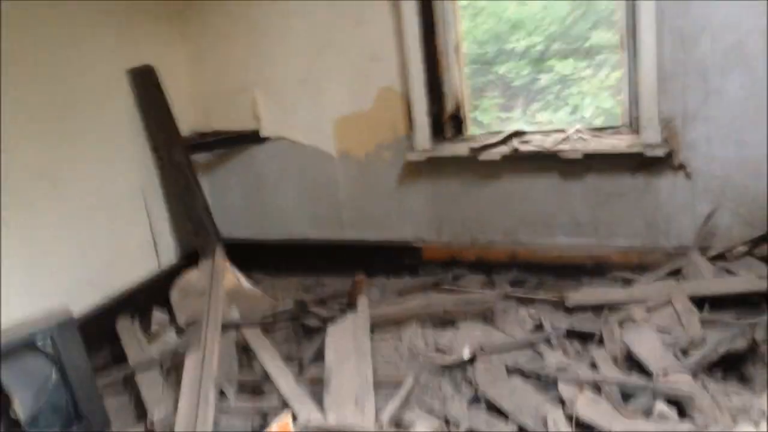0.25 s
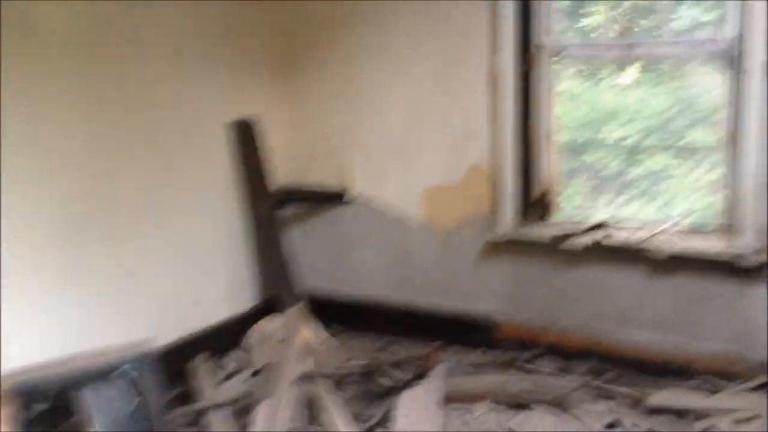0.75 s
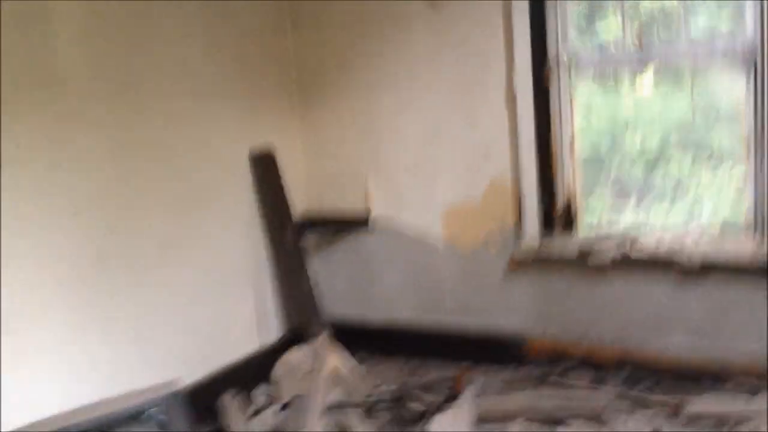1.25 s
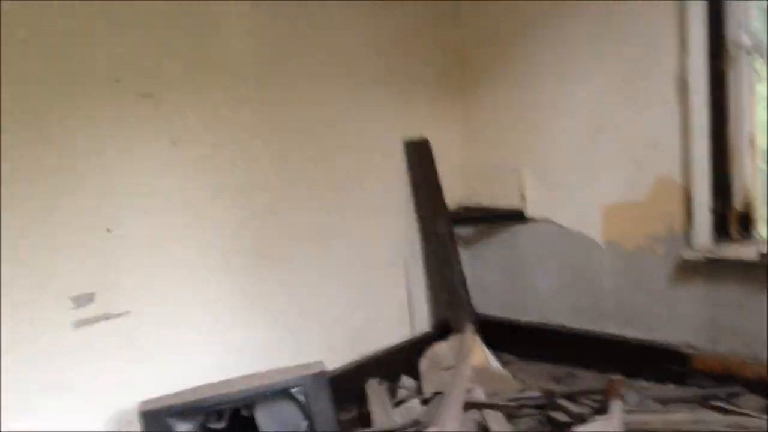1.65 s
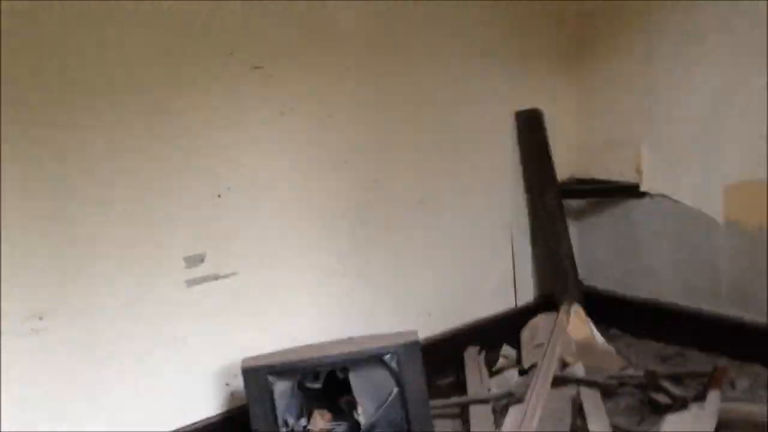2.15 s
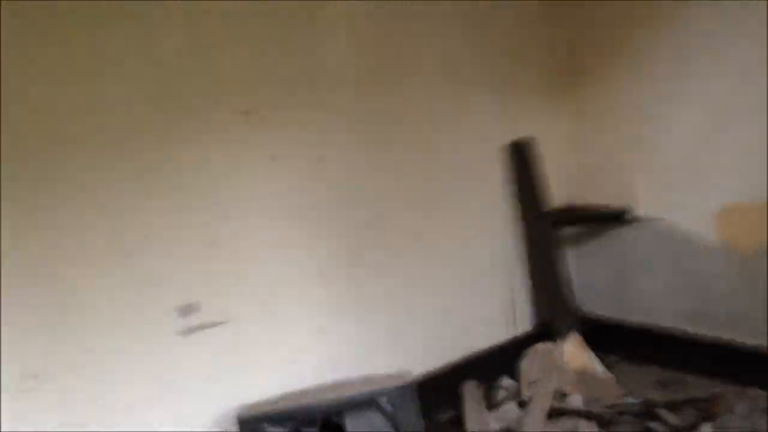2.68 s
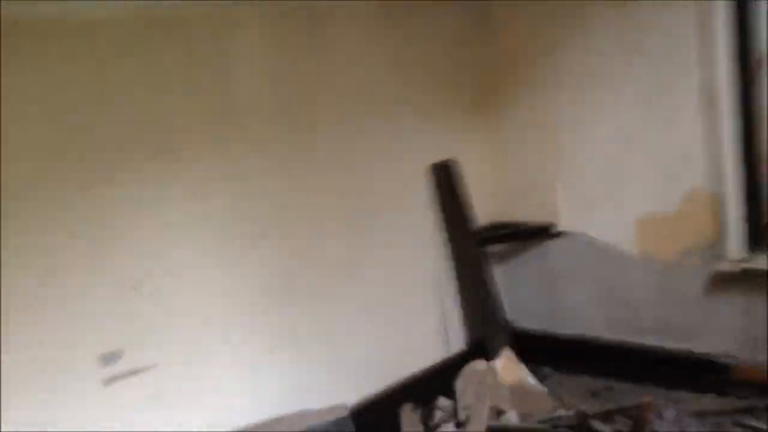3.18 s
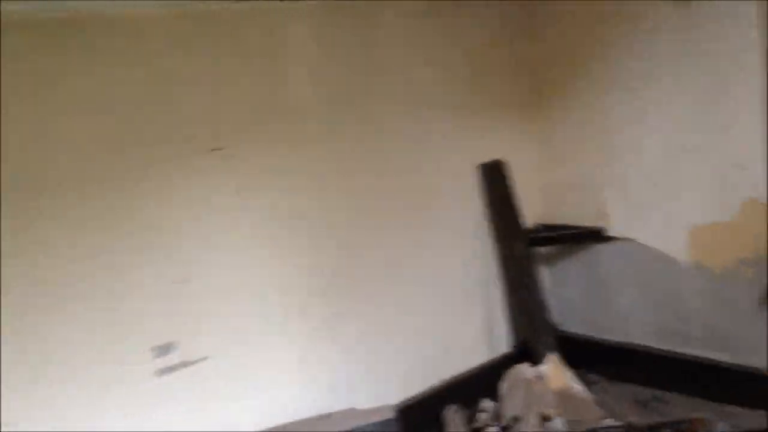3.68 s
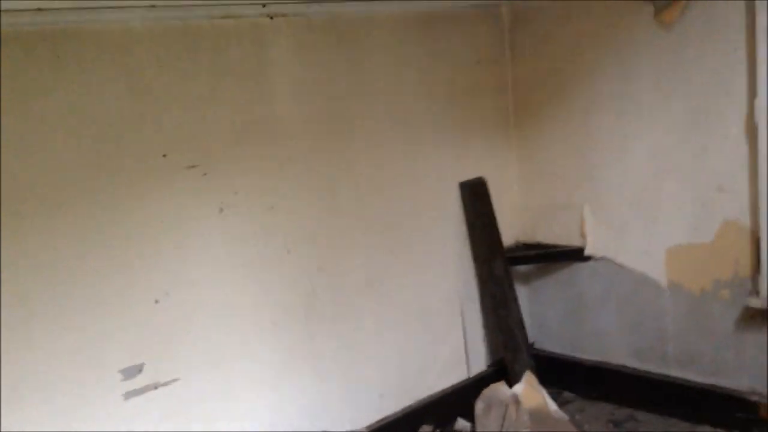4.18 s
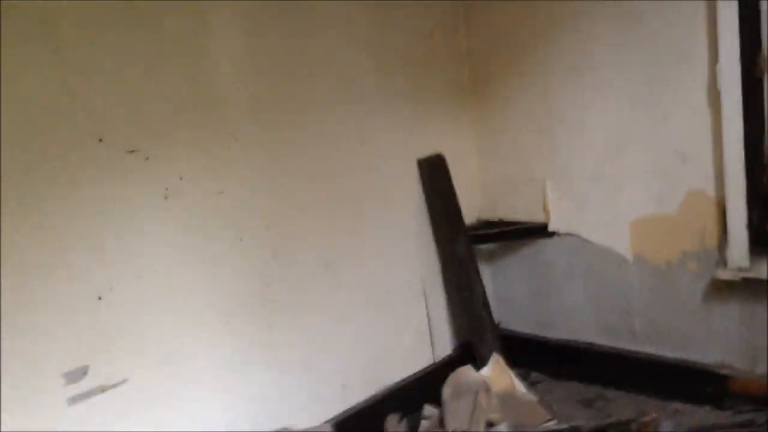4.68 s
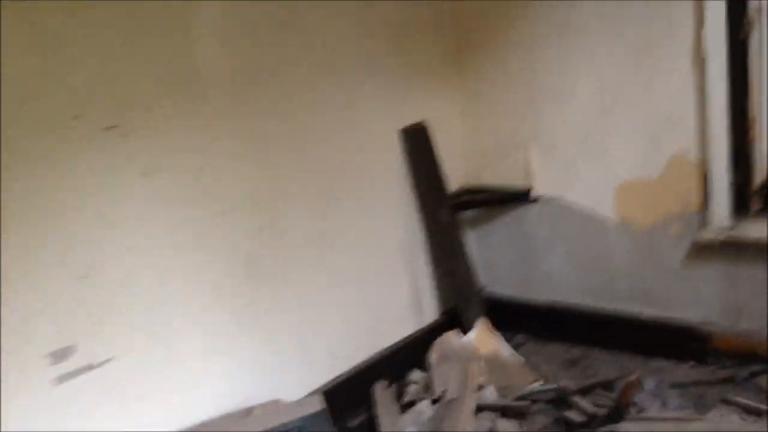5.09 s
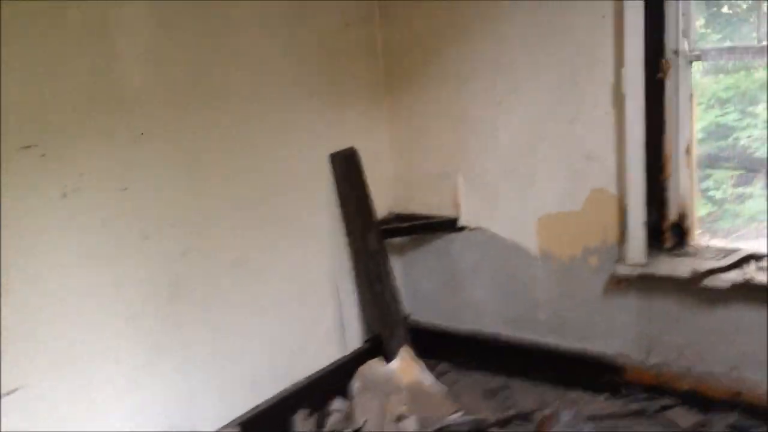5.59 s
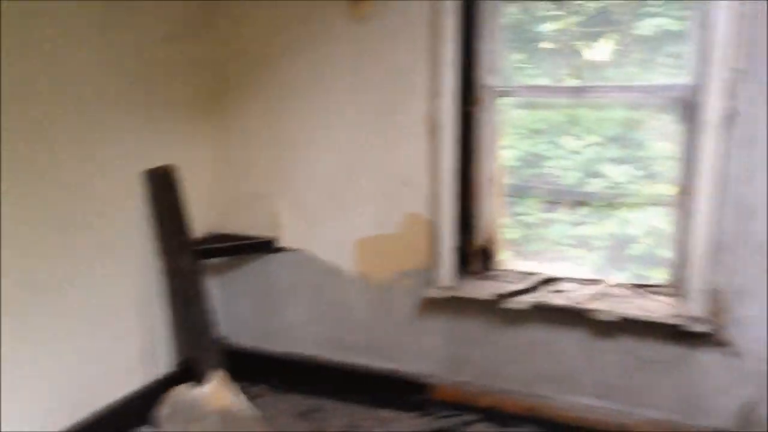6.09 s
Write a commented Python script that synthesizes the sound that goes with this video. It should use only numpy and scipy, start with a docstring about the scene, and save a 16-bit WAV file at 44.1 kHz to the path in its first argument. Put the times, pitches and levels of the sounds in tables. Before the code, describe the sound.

Feet shift over broken wood strips and plaster in a small bare room, near a handheld microphone. Light ticks and gritty crunching open the sound. From 0.6 to 1.8 seconds comes the busiest, loudest stretch: pieces snap sharply and rattle, loose boards knock, and the floor rumbles softly under each step. Quieter shuffling follows, with a soft crunch around 2.5 seconds. A small snap at 3 seconds leads to a sharp cluster of cracks and a knock at 3.2. Then the movement is lighter, with scattered clicks, a crunching step and thud at 4.4, and dull board bumps between 5 and 5.5 seconds. A last crack and crunch land just before 6 seconds. Two very faint, thin, distant chirps sound at about 5.5 and 6.2 seconds. The walls give the steps a short echo, and a quiet hiss runs underneath.

```python
"""A small bare room, where someone shifts and steps over broken laths and plaster, microphone in hand.
Pieces snap, ring briefly and rattle as they settle. Loose boards knock on the floor. Grit crunches
and slides under the soles in countless tiny breaks, and the floor rumbles below. The walls echo it all.
Two faint, thin chirps come from far off, over a quiet hiss."""
import sys
import numpy as np
from scipy import signal
from scipy.io import wavfile
from scipy.ndimage import uniform_filter1d

SR = 44100
rng = np.random.default_rng(int(sys.argv[2]) if len(sys.argv) > 2 else 0)


def generate_wav(sig):
    """Save sig (samples, or channels by samples) to the path in sys.argv[1] as 16-bit PCM at SR."""
    pcm = np.round(np.clip(np.atleast_2d(sig).T, -1, 1) * 32767).astype(np.int16)
    wavfile.write(sys.argv[1], SR, pcm)


N = 279594  # length in samples, about 6.3 seconds

# The tones of one piece. Each row: multiple of its pitch, level in dB, seconds to fade by 60 dB.
PIECE_TONES = [(1, 0, .011), (1.5, -6, .006), (.68, -7, .008), (2.1, -9, .005)]
# Pieces that break or clack. Each row: start in seconds, level in dB, pitch in Hz, splintering from
# 0 (clean clack) to 1 (all splinters), woody body in dB, rattle in dB (both relative to the crack).
SNAPS = [(0.091, -41, 2270, .4, -36, -11), (0.106, -28, 1190, .7, -37, -11),
         (0.256, -41, 1950, 0, -23, -11), (0.307, -29, 3740, 0.2, -15, -17),
         (0.389, -35.5, 3000, 0.67, -12, -16), (0.444, -40.5, 1640, 0.54, -23, -19),
         (0.606, -30.5, 1710, 0.58, -5.5, -4), (0.619, -28, 1170, .55, -28, -28),
         (0.641, -16, 2760, 0.63, -9.5, -3.5), (0.667, -13.5, 2460, 0.5, -11, -10),
         (0.686, -24, 2200, 0.07, -40, 0), (0.717, -29, 2360, 0.2, -26, 0),
         (0.847, -27.5, 2900, 0.72, -10, -10.5), (0.925, -30.5, 1020, 0.43, -3, -3.5),
         (0.985, -20, 2135, 0.36, -7, -14), (1.02, -17, 2730, 0.57, -41, -15),
         (1.049, -24, 2380, 0.36, -19, -7), (1.064, -28.5, 2440, 1, -13, -21),
         (1.131, -17.5, 2900, 0.49, -10.5, -19), (1.165, -14.5, 2030, 0.67, -6, -5.5),
         (1.384, -16, 2720, 0.66, -5.5, -15), (1.459, -40, 3070, 0.4, -11, -13),
         (1.495, -32, 1710, 0.63, -11, -1), (1.569, -39, 2960, .45, -23, -8),
         (1.587, -32.5, 2660, 0.57, -11, -16), (1.64, -20.5, 2850, 0.54, -9, -28),
         (1.657, -31.5, 1145, 0.14, 0, 0.5), (1.694, -38.5, 2580, 0.3, -2, -18),
         (1.747, -30.5, 1080, 0.82, -8, -3.5), (1.758, -29.5, 1100, 0.8, -10, -5.5),
         (1.824, -29.5, 1180, .7, -1.5, -7), (2.267, -39.5, 2480, 0.53, -42, -3.5),
         (2.376, -42, 2540, 0.97, -3, -0.5), (2.603, -43, 3030, .35, -24, -16),
         (2.972, -28.5, 2470, 0.3, -20.5, -13.5), (3.11, -41, 2247, 0.5, -11, -5),
         (3.176, -20, 2410, 0.56, -35, -12), (3.183, -15, 3000, 0.57, -35, -9),
         (3.196, -22, 2580, 0.5, -7, -16), (3.696, -49, 2940, .55, -19, 3),
         (3.804, -37, 1580, 0.2, -20, -3), (3.991, -36, 3860, 0.57, -29, -7),
         (4.041, -38.5, 1030, 0.38, -5, 1.5), (4.302, -42, 4320, 0.4, -17, -2),
         (4.407, -33.5, 1460, 0.63, -9, -20), (4.433, -35, 1160, 0.5, -26, -2.5),
         (4.52, -32.5, 5080, .55, -33, -5), (4.874, -40.5, 1920, .6, -2, 5.5),
         (5.299, -38.5, 1660, 0.93, -18, -11), (5.5, -43, 1840, .3, -21, -7),
         (5.67, -41, 2380, .5, -16, 1.5), (5.939, -23, 1600, 0.73, -18, -10),
         (5.951, -26.5, 2050, 0.55, -34, -10.5), (6.274, -42, 4530, 0.8, -4, -16)]

def snap(noise, db, hz, splintering, wood_db, rattle_db):
    """A blow and a burst of tiny breaks ring a piece of lath or plaster, which then rattles."""
    t = np.arange(len(noise)) / SR
    burst = noise * (t / 0.0022) ** 2 * np.exp(-t / 0.0013)
    blow = 9 * np.exp(-((t - .002) * hz * 5) ** 2)  # small stiff pieces take shorter blows
    tones = sum(gain(tone_db) * ring(ring(blow + burst, hz * k, fade_s), hz * k, fade_s / 2) * k
                for k, tone_db, fade_s in PIECE_TONES)
    splinters = unit_peak(band(burst, 1120, 4120))
    crack = unit_peak((1 - splintering) * unit_peak(tones) + splintering * splinters)
    # Louder snaps are duller, and clean clacks are duller still.
    treble_db = -2.5 - 0.18 * (db + 34.5) - 33.5 * (1 - splintering)
    treble = gain(treble_db) * unit_peak(band(burst, 2400, 9700))
    wood = gain(wood_db) * unit_peak(band(burst, 590, 1030))
    grainy = noise[::-1] ** 3  # cubing makes a few spikes stand out
    patter = grainy * (1 - np.exp(-(t / 0.0037) ** 2)) * np.exp(-t / 0.023)
    rattle = sum(gain(tone_db) * ring(patter, hz * k, fade_s) for k, tone_db, fade_s in PIECE_TONES)
    return gain(db) * (crack + treble + wood + gain(rattle_db) * unit_peak(rattle))

# The tones of one board. Each row: multiple of its pitch, strength in dB.
BOARD_TONES = [(0.983, 4), (1.747, -1.5), (0.669, -12), (2.5, -21)]
# Loose boards hitting the floor. Each row: start in seconds, peak level in dB, pitch in Hz,
# seconds for a tone at that pitch to fade by 60 dB.
KNOCKS = [(0.106, -40, 490, 0.088), (0.321, -41.5, 201, 0.035), (0.608, -38.5, 179, 0.24),
          (0.623, -33.5, 240, 0.046), (0.667, -32, 111, 0.12), (0.711, -30.5, 171, 0.038),
          (0.847, -32.5, 340, 0.025), (0.919, -37, 417, 0.075), (.980, -25, 199, 0.13),
          (1.044, -33, 207.5, 0.17), (1.129, -46, 157, 0.096), (1.164, -25, 337.6, 0.13),
          (1.169, -18.5, 180, 0.025), (1.247, -42, 135, 0.11), (1.306, -39, 74, 0.12),
          (1.383, -23.5, 208, 0.072), (1.494, -39, 169, 0.11), (1.519, -35.5, 163, 0.033),
          (1.606, -37, 138, 0.086), (1.639, -25.5, 304, 0.027), (1.746, -31.5, 381, 0.088),
          (1.759, -32, 113, 0.095), (1.825, -24, 166, 0.038), (3.137, -41.5, 148, 0.13),
          (3.184, -29, 167, 0.079), (3.238, -36, 142.6, 0.063), (3.662, -45, 263, 0.055),
          (3.814, -52, 123, 0.12), (4.042, -54, 224, 0.17), (4.430, -29, 183, 0.02), (4.44, -30, 74, 0.18),
          (4.877, -51, 418, 0.048), (5.026, -36.5, 131, 0.19), (5.066, -39, 127.6, 0.081),
          (5.094, -35.5, 127, 0.16), (5.302, -45.5, 427, 0.027), (5.433, -45.5, 296.5, 0.051),
          (5.463, -33, 246, 0.052), (5.936, -38, 506, 0.036)]

def knock(noise, db, hz, fade_s):
    """A soft push and rebound, then smaller bumps, ring a board. Its higher tones fade sooner."""
    t = np.arange(len(noise)) / SR
    push = np.exp(-((t - .002) / 0.00057) ** 2)
    bumps = 0.41 * uniform_filter1d(noise, 20) * np.exp(-t / 0.0076)
    force = np.gradient(push + bumps)  # the slope turns each push into a push and a rebound
    tones = sum(gain(tone_db) * ring(force, hz * k, fade_s / np.sqrt(k)) / k
                for k, tone_db in BOARD_TONES)
    return gain(db) * unit_peak(tones)

# Grit shifting between steps. Each row: time in seconds, crunch level in dB, floor rumble level in dB.
SHUFFLE = [(0, -69, -66.5), (.33, -58.5, -55), (.57, -67.5, -70.5), (0.901, -54.5, -57), (1.25, -57, -46),
           (1.55, -55.5, -68), (1.84, -53.5, -42.5), (1.93, -65.5, -67), (2.35, -62.5, -63),
           (2.9, -68.5, -64), (3.1, -61.5, -62.5), (3.45, -62, -64), (3.9, -57.5, -57), (4.599, -61.5, -63),
           (4.84, -70, -65.5), (4.97, -61.5, -68), (5.25, -74, -66), (5.339, -64, -65), (5.9, -61.5, -59.5),
           (6.2, -67, -67.5)]
# A sole presses the grit. Each row: time of full weight in seconds, seconds held, crunch level in dB,
# fine dust in dB relative to the crunch, floor rumble level in dB.
PRESSES = [(.17, 0.046, -60, -5, -58), (0.248, 0.0062, -48, -6, -62), (.43, 0.0065, -60, -9, -67),
           (0.632, 0.083, -45.5, -9, -45.5), (.835, 0.04, -56.5, -6, -50.5),
           (1.012, 0.0092, -41, -15, -36.5), (1.059, 0.021, -48.5, -3, -54),
           (1.15, 0.058, -41.5, -12.5, -43), (1.31, 0.03, -48.5, -9, -57), (1.419, 0.021, -51, -12, -49),
           (1.62, 0.037, -44.5, -19, -45.5), (1.78, 0.035, -49.5, -14, -59),
           (2.448, 0.052, -51.5, -7, -54.5), (2.55, 0.037, -55, -8, -55), (3.17, .015, -49.5, -8, -50),
           (3.213, 0.0056, -34.5, -10, -40.5), (3.6, 0.017, -58.5, -4.5, -74), (3.7, 0.023, -61, -2, -62),
           (3.79, 0.057, -58, -4, -64), (3.92, 0.044, -58.5, -13, -57), (4.09, 0.025, -53.5, -23, -66),
           (4.329, 0.0061, -58.5, 0.5, -54.5), (4.445, 0.052, -43.5, -6.5, -56),
           (4.898, 0.0066, -53.5, -8, -49.5), (5.02, .03, -53, -10.5, -53), (5.075, 0.035, -53, -5.5, -48),
           (5.17, 0.035, -70.5, -3, -61.5), (5.44, 0.032, -57, -10, -55.5), (5.49, 0.011, -54, -8, -48.5),
           (5.694, 0.017, -59.5, 5.5, -65), (5.969, .025, -46.5, -10, -58), (6.278, 0.004, -63, 6.5, -58)]

def footwork():
    """How loud crunch, dust and rumble are over time: each press builds, holds and lifts."""
    press_db_per_s, lift_db_per_s, shuffle_dust_db = 336, 232, -7
    t = np.arange(N) / SR
    times, crunch_db, rumble_db = np.transpose(SHUFFLE)
    shuffle_db = [np.interp(t, times, db) for db in (crunch_db, crunch_db + shuffle_dust_db, rumble_db)]
    power = gain(shuffle_db) ** 2
    for full_s, held_s, crunch_db, dust_db, rumble_db in PRESSES:
        before_s, after_s = np.maximum(full_s - t, 0), np.maximum(t - full_s - held_s, 0)
        weight = gain(-press_db_per_s * before_s - lift_db_per_s * after_s)
        power += np.outer(gain([crunch_db, crunch_db + dust_db, rumble_db]), weight) ** 2
    return np.sqrt(power)

def grains(per_second, spread_db):
    """Tiny breaks at random moments, most weak and a few strong."""
    size = gain(spread_db * np.minimum(rng.exponential(1, N), 5))
    return size * rng.choice([-1., 1.], N) * (rng.random(N) < per_second / SR)

# The tone of crushed grit. Each row: frequency in Hz, relative level in dB.
GRIT_SPECTRUM = [(240, -45), (400, 1.5), (640, -0.5), (712, -1.5), (1370, 3), (1770, 3), (2470, 2.5),
                 (2790, 1.5), (5030, -4.5), (15000, -16.5)]
# The deep tone of the shaking floor. Each row: frequency in Hz, relative level in dB.
FLOOR_SPECTRUM = [(18, -55), (30, 1), (55, -3), (128, -2.5), (313, -5.5), (392, -9.5), (430, -14),
                  (700, -14.5), (910, -43.5), (1540, -120)]

def grit():
    """Grit breaks in clumps under a sole: coarse crunch, fine dust and the shaking floor below."""
    wander = uniform_filter1d(uniform_filter1d(rng.standard_normal(N), 300), 300)
    clumps = gain(1.07 * unit_rms(wander))
    chips = sum(ring(grains(150, spread_db=3), hz, fade_s=.009) for hz in np.geomspace(550, 7000, 16))
    breaks = unit_rms(grains(8000, spread_db=2)) + .5 * unit_rms(chips)
    crush = colour(clumps * breaks, GRIT_SPECTRUM)
    crunch = unit_rms(keep_side(crush, "low", hz=5000, order=4))
    dust = unit_rms(keep_side(crush, "high", hz=5000, order=4))
    rumble = colour(clumps * grains(1500, spread_db=1.9), FLOOR_SPECTRUM)
    return (footwork() * [crunch, dust, rumble]).sum(0)

# The first echoes off the walls. Each row: delay in seconds, level in dB.
WALL_ECHOES = [(0.012, -18.5), (0.018, -17), (0.023, -22), (0.03, -39)]
# How long the room rings. Each row: frequency in Hz, seconds to fade by 60 dB.
ROOM_FADES = [(100, 0.33), (400, 0.33), (1800, 0.043), (5000, 0.11), (12000, 0.41)]

def room_echo(sound):
    """The walls return a few clear echoes and many random ones, each band fading at its own speed."""
    echoes = np.zeros(SR // 2)
    slots = np.arange(500, len(echoes) - 20, 20)  # one echo somewhere in every 20 samples
    echoes[slots + rng.integers(0, 20, len(slots))] = rng.choice([-1., 1.], len(slots))
    hz, t, bands = signal.stft(echoes, SR, nperseg=256)
    fade = gain(-60 * t / look_up(ROOM_FADES, hz)[:, None])
    tail = signal.istft(bands * fade, SR, nperseg=256)[1]
    tail *= gain(-13.5) / np.linalg.norm(tail)
    for delay_s, db in WALL_ECHOES:
        add(tail, delay_s, gain([db]))
    return signal.fftconvolve(sound, tail)[:N]

# Faint chirps from far off. Each row: start in seconds, length in seconds, pitch in Hz, level in dB.
CHIRPS = [(5.54, .045, 5200, -71), (6.156, 0.07, 5300, -66.5)]

def chirp(length_s, hz, db):
    """One thin, steady tone that fades in and out."""
    t = np.arange(round(length_s * SR)) / SR
    return gain(db) * np.sqrt(2) * np.sin(2 * np.pi * hz * t) * signal.windows.tukey(len(t), .4)

# The tone of the background hiss. Each row: frequency in Hz, relative level in dB.
HISS_SPECTRUM = [(15, -48), (25, 12), (107, -17.5), (313, -3), (410, 1), (1110, -13), (1270, -19),
                 (1660, -24), (2420, -17.5), (6210, -9), (14300, -11), (15500, -13.5)]

def hiss(db=-65):
    """Quiet, steady noise behind everything."""
    return gain(db) * colour(rng.standard_normal(N), HISS_SPECTRUM)

def ring(force, hz, fade_s):
    """One tone, set ringing by a force, that fades by 60 dB in fade_s seconds."""
    decay = 10 ** (-3 / (fade_s * SR))
    angle = 2 * np.pi * min(hz, .45 * SR) / SR
    return signal.lfilter([np.sin(angle)], [1, -2 * decay * np.cos(angle), decay ** 2], force)

def colour(sound, spectrum):
    """Shape a sound's tone with a spectrum table and bring its average level to 1."""
    hz = abs(np.fft.fftfreq(8192, 1 / SR))
    log_gain = np.log(gain(np.maximum(look_up(spectrum, hz), -100)))
    response = np.exp(np.conj(signal.hilbert(log_gain)))  # rings after a click, never before it
    taps = np.fft.ifft(response).real[:4096]
    return unit_rms(signal.oaconvolve(sound, taps)[:N])

def look_up(table, hz):
    """Read between a table's rows to get its value at any frequency."""
    row_hz, values = np.transpose(table)
    return np.interp(np.log(hz + 1), np.log(row_hz + 1), values)

def keep_side(sound, side, hz, order):
    """Keep what is on the "low" or "high" side of hz. A higher order cuts more sharply."""
    return signal.sosfilt(signal.butter(order, hz, side, fs=SR, output="sos"), sound)

def band(sound, low_hz, high_hz):
    return signal.sosfilt(signal.butter(2, [low_hz, high_hz], "band", fs=SR, output="sos"), sound)

def gain(db):
    return 10 ** (np.asarray(db) / 20)

def unit_peak(sound):
    return sound / abs(sound).max()

def unit_rms(sound):
    """Scale a sound so that its average level (root mean square) is 1."""
    return sound / np.sqrt(np.mean(sound ** 2) + 1e-20)

def add(mix, start_s, sound):
    part = mix[round(start_s * SR):][:len(sound)]
    part += sound[:len(part)]

def scene():
    """Mix all the sources with the room's echo, the same in both channels."""
    events = np.zeros(N)
    # Snaps and knocks begin a moment early because they take that long to build.
    for start_s, *settings in SNAPS:
        add(events, start_s - .0015, snap(rng.standard_normal(6000), *settings))
    for start_s, *settings in KNOCKS:
        add(events, start_s - .0025, knock(rng.standard_normal(9000), *settings))
    for start_s, *settings in CHIRPS:
        add(events, start_s, chirp(*settings))
    crunch = grit()
    mono = events + crunch + hiss() + room_echo(events + .5 * crunch)
    return np.tile(mono, (2, 1))

def record(dry):
    """The small microphone loses the deepest bass, and the recorder loses the highest treble."""
    bass_edge_hz, treble_edge_hz = 65, 15650
    thinned = keep_side(dry, "high", bass_edge_hz, order=2)
    treble_cut = signal.firwin(511, treble_edge_hz, window=("kaiser", 9), fs=SR)
    return signal.oaconvolve(thinned, treble_cut[None], "same")

dry = scene()
out = record(dry)
generate_wav(out)
```